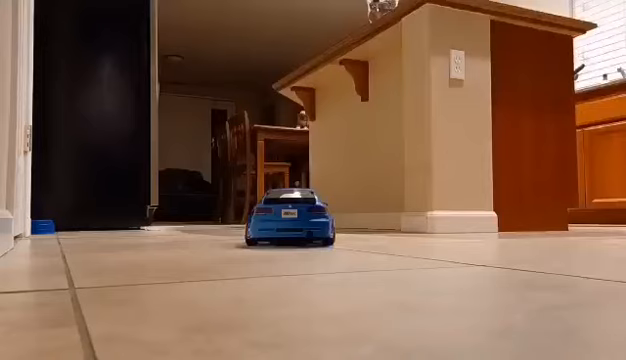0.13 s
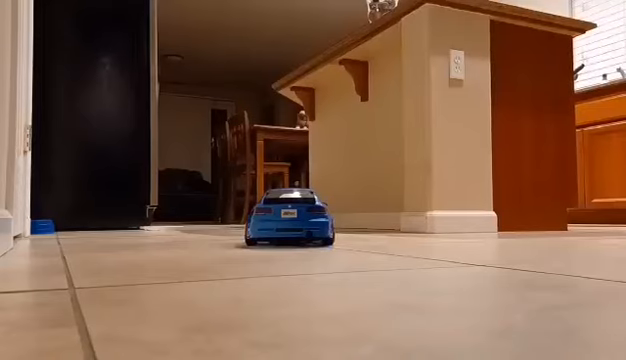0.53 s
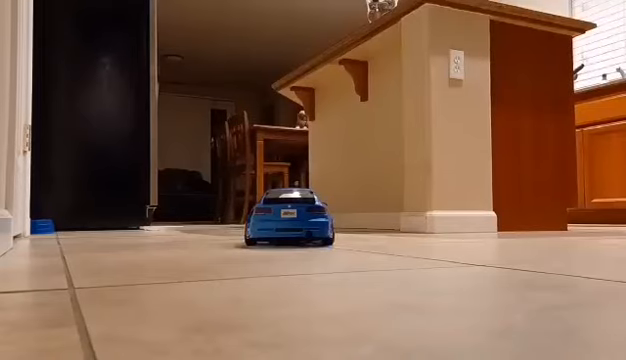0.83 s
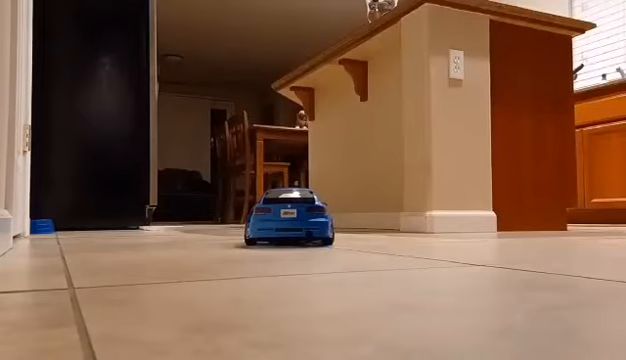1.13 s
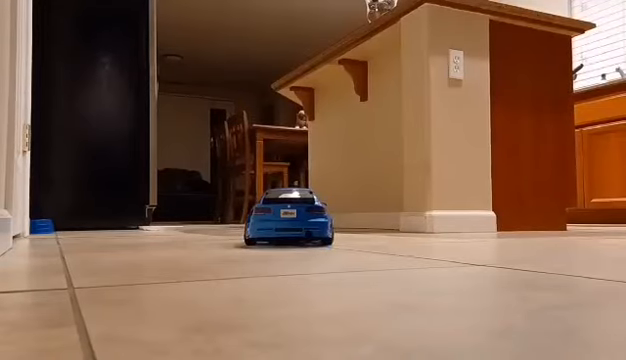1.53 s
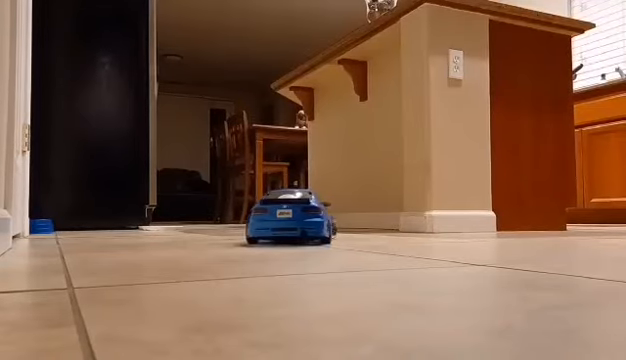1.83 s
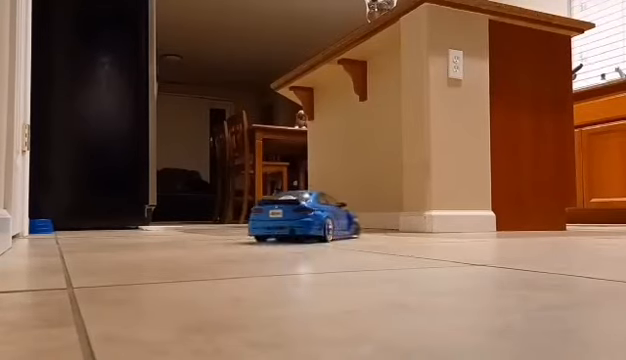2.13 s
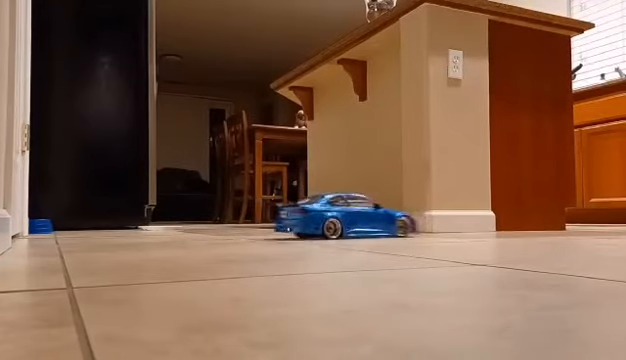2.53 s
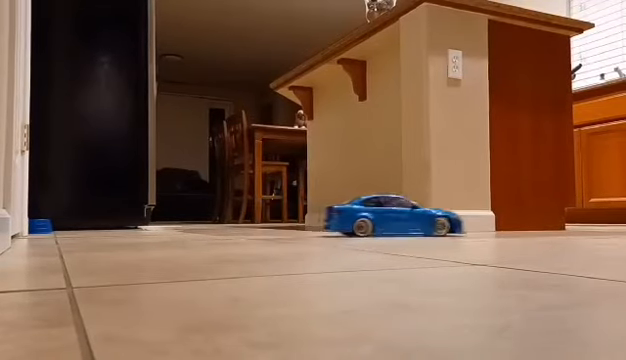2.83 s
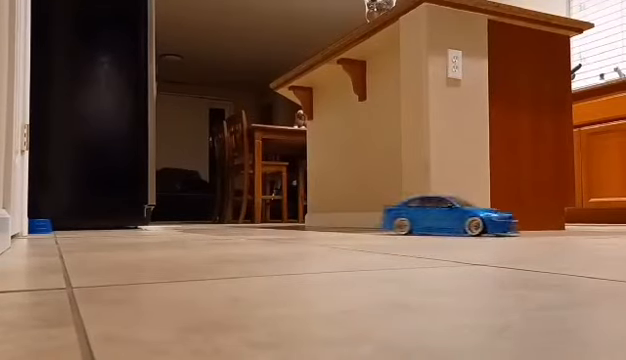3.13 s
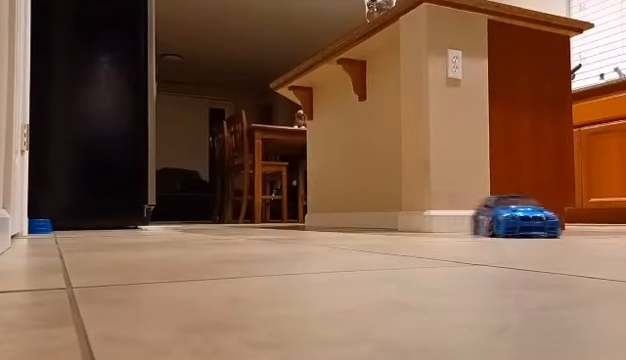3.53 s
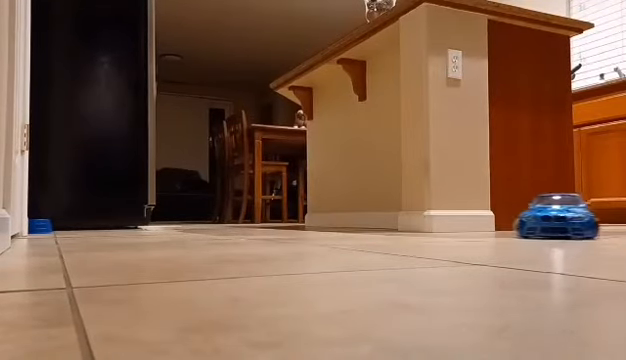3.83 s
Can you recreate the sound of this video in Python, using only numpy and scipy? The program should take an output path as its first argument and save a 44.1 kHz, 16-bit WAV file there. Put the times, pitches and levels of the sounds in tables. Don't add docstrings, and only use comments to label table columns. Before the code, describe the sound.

A small electric toy car waits in a quiet, faintly humming kitchen, ticks faintly, then whirs away with gear whine and tyre rumble; bright pops echo nearby, heard from a stereo microphone at floor level.

```python
import sys
import numpy as np
from scipy import signal
from scipy.io import wavfile
from scipy.ndimage import uniform_filter1d

SR = 44100
rng = np.random.default_rng(int(sys.argv[2]) if len(sys.argv) > 2 else 0)


def output_pcm(signal):
    pcm = np.clip(np.atleast_2d(signal).T, -1, 1) * 32767
    wavfile.write(sys.argv[1], SR, np.round(pcm).astype(np.int16))


def ratio_of_db(decibels):
    return 10 ** (np.asarray(decibels, float) / 20)


N = 176400
T = np.arange(N) / SR

# t/s, snap
# level/dB, thump level/dB, thump left-right/dB, ducking/dB
SPARKS = [(1.8840, -12.5, -10, -4, 12), (2.132, -15.5, -18, 17.5, 8), (2.2839, -13, -19, 7, 10),
          (2.3834, -15, -72, -11, 0.5), (2.4764, -12.5, -31.5, -5, 3.5), (2.623, -11.5, -32.5, -4, 8),
          (2.7401, -7, -26.5, 1.5, 11.5), (2.9387, -9, -46, -9, 2.5), (3.0532, -11, -35.5, -11, 2),
          (3.3251, -11.5, -54, -4, 1), (3.444, -8, -40, -3, 2), (3.6926, -5, -28, 2, -1),
          (3.9272, -8, -39, 4, -0.5), (1.8903, -12.5, -40, -2, 2), (2.139, -17, -42, -2, -0.5),
          (2.29, -12, -34, -5, 1)]
# (f/Hz, left-right/dB)
CAR_SAME = [(100, 0.9), (400, 0.61), (1000, 0.13), (5000, 0.046)]
CAR_LEFT = [(300, 1.7), (2000, 2.2), (12000, 0.73)]


def evened(x):
    return x / np.sqrt(np.mean(x ** 2) + 1e-20)


def read(points, hz):
    f, v = np.transpose(points)
    return np.interp(np.log(hz + 1), np.log(f + 1), v)


def resonate(x, hz, width):
    turn = np.exp(2j * np.pi * np.cumsum(hz * np.ones(N)) / SR)
    r = np.exp(-np.pi * width / SR)
    for _ in range(2):
        x = 2 * (turn * signal.lfilter([1 - r], [1, -r], x / turn)).real
    return x


def resonate_once(x, hz, width):
    turn = np.exp(2j * np.pi * hz * np.arange(1, N + 1) / SR)
    r = np.exp(-np.pi * width / SR)
    return 2 * (turn * signal.lfilter([1 - r], [1, -r], x / turn)).real


def noise(shape, same, left_db, patchy_db, churn_db, flicker_db):
    frames, hz = N // 128 + 5, np.fft.rfftfreq(512, 1 / SR)
    a, b, c, d, patches, churn = rng.standard_normal((frames, 257, 6)).T
    patches = evened(uniform_filter1d(uniform_filter1d(patches, size=4, axis=0), size=12, axis=1))
    churn = evened(uniform_filter1d(uniform_filter1d(churn, size=4, axis=0), size=50, axis=1))
    flicker = evened(uniform_filter1d(rng.standard_normal(frames), size=3))
    alike = np.clip(read(same, hz), -1, 1)[:, None]
    left = a + 1j * b
    right = alike * left + np.sqrt(1 - alike ** 2) * (c + 1j * d)
    level_db = read(shape, hz)[:, None] + patchy_db * patches + churn_db * churn + flicker_db * flicker
    side_db = read(left_db, hz)[:, None] / 2
    z = np.array([left, right]) * ratio_of_db(level_db) * ratio_of_db(np.array([side_db, -side_db]))
    return evened(signal.istft(z, nperseg=512, noverlap=384)[1][:, :N])


def ring(modes, length):
    t = T[:length]
    return sum(ratio_of_db(db - 60 * t / t60) * np.sin(2 * np.pi * hz * t) for hz, t60, db in modes)


def room():
    # f/Hz, level/dB per Hz
    air = [(15, -50), (25, -20), (54, 7), (516, -2.5), (1110, -9.5), (1480, -12.5), (3350, -4), (9300, -21),
           (13500, -34)]
    # f/Hz, left-right likeness
    air_same = [(60, 0.47), (280, 0.88), (700, 0.043), (2000, 0.0082)]
    # f/Hz, left-right/dB
    air_left = [(60, 2.5), (500, 11), (1200, 19), (2300, 2.5), (8000, 4.5), (13000, -23)]
    # f/Hz, level/dB rms
    hum_lines = [(59.2, -68.5), (1116, -68.5), (2234, -80.5), (3340, -73.5)]
    hum = np.zeros((2, N))
    for hz, db in hum_lines:
        side_db = read(air_left, hz) / 2 * np.array([[1], [-1]])
        hum += np.sqrt(2) * ratio_of_db(db + side_db) * np.sin(2 * np.pi * hz * T + 6 * rng.random())
    return ratio_of_db(-54) * noise(air, air_same, air_left, patchy_db=0.15, churn_db=0.65, flicker_db=-0.3) + hum


def waiting_ticks():
    # t/s, peak level/dB
    ticks = [
        (0.2628, -49),
        (0.2941, -67),
        (0.306, -43),
        (0.433, -44),
        (0.568, -42.5),
        (1.4725, -42),
        (1.4897, -35),
        (1.5097, -30.5),
    ]
    s, db = np.transpose(ticks)
    clicks = np.zeros((2, N))
    clicks[:, (s * SR).astype(int)] = ratio_of_db(db + np.array([[2.5], [-3.5]]))
    tick = ring([(12200, 0.004, -6), (11500, 0.0036, -2.0), (10200, 0.0032, -9), (7660, 0.0036, -5.5)], 600)
    return signal.oaconvolve(clicks, tick[None])[:, :N]


def gear_hiss(turns, away):
    # f/Hz, level/dB per Hz
    hiss_near = [(50, -45), (282, -7), (429, -20), (542, -11.5), (1000, -10), (4870, -15), (6150, -23.5),
                 (11800, -15.5), (13300, -27)]
    # f/Hz, level/dB per Hz
    hiss_away = [(29, -63), (50, -62), (282, 2.5), (429, -3.5), (885, -0.5), (2780, -1.5), (4870, -7),
                 (7960, -2.5), (13300, -70)]
    near = noise(hiss_near, CAR_SAME, CAR_LEFT, patchy_db=0.5, churn_db=3.0, flicker_db=-0.7)
    far = noise(hiss_away, CAR_SAME, CAR_LEFT, patchy_db=1.5, churn_db=2.0, flicker_db=4.0)
    hiss = np.sqrt(1 - away) * near + ratio_of_db(0.7) * np.sqrt(away) * far
    return hiss * (1 + 0.23 * np.cos(4 * np.pi * turns))


def chassis_rings(rattle, rate):
    # f/Hz, width/Hz, level/dB
    parts = [(1785, 140, -4.5), (2180, 170, -11.5), (2710, 820, -2), (5030, 1800, -8), (6650, 760, -8.5),
             (9840, 680, -3.5), (10340, 1700, -3.5), (12130, 480, -8.5)]
    rings = sum(ratio_of_db(db) * evened(resonate_once(rattle, hz, width)) for hz, width, db in parts)
    return ratio_of_db(-2) * rings * (rate / 28) ** 1.6


def gear_mesh(rattle, rate):
    teeth = [(67.6, -12, 25, 1.65, 2.5), (150, -2, 380, 1.53, 1.72), (121, -1, 450, 1.54, 1.65),
             (172.2, -9, 400, 1.6, 2.6), (32.5, -10, 130, 1.58, 2), (104, -1.5, 960, 3.38, 3.63),
             (99.6, 2.5, 720, 3.7, 3.84), (111.1, 0.5, 640, 3.92, 4.05), (136, -0.5, 57, 3.96, 4.05),
             (23.48, -6, 100, 3.52, 3.7), (41.13, -3.5, 86, 3.93, 5.4), (94.5, -1.5, 1800, 2.52, 2.66)]
    mesh = np.zeros((2, N))
    for k, db, fuzz, on, off in teeth:
        fade = np.clip(np.minimum(T - on, off - T) / 0.051, 0, 1)
        mesh += ratio_of_db(db) * fade * evened(resonate(rattle, k * rate, fuzz))
    return mesh


def tyre_drum(turns):
    # f/Hz, width/Hz, level/dB
    shell = [(285, 81, -13.5), (349.2, 38, -5.5), (432.6, 23.5, 0), (501, 62, -3.5)]
    # multiple of axle rate, level/dB
    orders = [(9, -15), (11, -4), (12, -18), (13, -7), (15, 0), (17, -11), (20, -13), (22, -17)]
    clean_from_s, clean_until_s, clean_db, worn_db = 1.73, 2.465, -3.5, -15.5
    rub = rng.standard_normal(N) + 0.23 * rng.standard_normal((2, N))
    drum = evened(sum(ratio_of_db(db) * evened(resonate(rub, hz, width)) for hz, width, db in shell))
    lines = sum(ratio_of_db(db) * np.sin(2 * np.pi * (k * turns + rng.random())) for k, db in orders)
    worn = np.clip(np.maximum(T - clean_until_s, clean_from_s - T) / 0.11, 0, 1)
    grip = ratio_of_db(clean_db + worn_db * worn)
    return ratio_of_db(-3.5) * drum * np.sqrt(1 - np.minimum(0.98 * grip, .9)) + grip * lines


def car():
    # t/s, axle rate/Hz, motor effort/dB, tyre drumming/dB
    drive = [(1.497, 9.4, -62.5, -73.5), (1.513, 12.4, -36, -55), (1.591, 21.9, -25, -38.5),
             (1.702, 27, -26.5, -28.5), (1.841, 28.7, -27, -24.5), (1.969, 29.2, -30, -28.5),
             (2.46, 28.7, -34, -30.5), (2.56, 28, -36, -34.5), (2.703, 23.9, -36.5, -32),
             (3.12, 26.5, -38, -32.5), (3.261, 26, -52, -32), (3.311, 24.4, -51, -36.5),
             (3.35, 27, -38.5, -34), (3.702, 27.6, -37, -32), (3.771, 25, -36, -39),
             (3.893, 20, -47.5, -35), (3.939, 24.3, -37, -52), (4.0, 25.4, -33.5, -31.5)]
    s, rate, effort_db, tyre_db = np.transpose(drive)
    rate = np.interp(T, s, rate)
    effort, tyre = ratio_of_db(np.interp(T, s, effort_db)), ratio_of_db(np.interp(T, s, tyre_db))
    wobble = evened(uniform_filter1d(rng.standard_normal(N), size=3000))
    turns = np.cumsum(rate * (1 + 0.0029 * wobble)) / SR
    away = np.clip((T - 2.515) / 0.52 + .5, 0, 1)
    flat = [(50, 0), (13200, 0), (13500, -40)]
    rattle = noise(flat, CAR_SAME, CAR_LEFT, patchy_db=3, churn_db=3.5, flicker_db=1.1)
    whine = gear_hiss(turns, away) + chassis_rings(rattle, rate)
    tile = .2 + (.45 - .2) * away
    whine = ratio_of_db(-1.7) * (whine + tile * np.roll(whine, 11, axis=1))
    motor = effort * (whine + gear_mesh(rattle, rate))
    return motor + tyre * tyre_drum(turns) * ratio_of_db(np.array([[1.3], [-1.3]]))


def echoing_space():
    # delay/s, level/dB
    echoes = [
        (.0056, -9),
        (.0102, -9),
        (.0135, -12),
        (.021, -15),
    ]
    t = T[:15000]
    space = ratio_of_db(-3.5 - 60 * t / .3) * rng.standard_normal((2, 15000)) * (t > .004) / 30
    space[:, 0] = 1
    for delay, db in echoes:
        space[[0, 1], (delay * SR + rng.uniform(-8, 8, 2)).astype(int)] += ratio_of_db(db)
    return space


def pops():
    # f/Hz, t60/s, level/dB
    snap_modes = [(8050, .0055, 2), (9600, .004, -3), (11200, .004, -1), (12700, .004, -1),
                  (13900, .002, -12), (7000, .003, -11), (4600, .003, -10), (3300, .003, -8),
                  (2100, .004, -9)]
    # f/Hz, t60/s, level/dB, extra loss at the far port/dB per dB, extra loss as blows weaken/dB per dB, lag/s
    boom_modes = [(90, .075, -3.5, 4, .25, 0), (205, .055, -10, 0, -.2, .0012)]
    t, snaps, blows = T[:4000], np.zeros((2, N + 4000)), np.zeros((2, N + 4000))
    u = t / .00035
    blow = np.exp(-u) * np.minimum(u / .7, 1) * 2.6
    for s, snap_db, thump_db, left_db, _ in SPARKS:
        i = round(s * SR)
        weaker_db = thump_db + abs(left_db) / 2 + 8.5
        for ch, sign in enumerate((.5, -.5)):
            detune, colour = rng.standard_normal((2, len(snap_modes)))
            modes = [(hz * (1 + 0.01 * a), t60, db + 2.5 * b)
                     for (hz, t60, db), a, b in zip(snap_modes, detune, colour)]
            snaps[ch, i:i + 800] += ratio_of_db(snap_db - 5.5) * ring(modes, 800) * np.minimum(t[:800] / 0.0001, 1)
            boom = np.zeros(4000)
            for hz, t60, db, lean, loss, lag in boom_modes:
                boom_db = db + lean * min(sign * left_db, 0) + loss * weaker_db - 60 * t / t60
                boom -= ratio_of_db(boom_db) * np.cos(2 * np.pi * hz * (t - lag))
            thump = blow + boom * np.minimum(t / .0012, 1)
            blows[ch, i:i + 4000] += ratio_of_db(thump_db + sign * left_db) * thump
    return signal.fftconvolve(snaps, echoing_space(), axes=1)[:, :N] + blows[:, :N]


def gain_control():
    duck_db = np.zeros(N)
    for s, _, _, _, depth_db in SPARKS:
        width = np.where(T < s, .007, .033)
        duck_db += depth_db * np.exp(-((T - s) / width) ** 2)
    return ratio_of_db(-duck_db)


def masked(x):
    # from t/s, until t/s
    sags = [
        (1.9, 1.925),
        (2.86, 2.93),
        (3.78, 3.86),
        (3.89, 3.92),
    ]
    edge_hz = 13200
    hz, t, z = signal.stft(x, SR, nperseg=1024, noverlap=768)
    ripple = uniform_filter1d(rng.standard_normal(z.shape[1:]), size=2, axis=0)
    ripple = evened(uniform_filter1d(ripple, size=9, axis=1))
    top_db = -12 * np.maximum(hz - edge_hz, 0)[:, None] / 1000
    z = z * ratio_of_db(2.6 * ripple * (hz > 600)[:, None] + top_db)
    power = (abs(z) ** 2).sum(0)[:512].reshape(128, 4, -1).mean(1)
    level_db = 10 * np.log10(uniform_filter1d(power, size=5, axis=1) + 1e-20)
    whim = evened(uniform_filter1d(rng.standard_normal(power.shape), size=5, axis=1))
    weak = level_db + 3 * whim < uniform_filter1d(level_db, size=15, axis=0) - 4.2
    sagging = np.any([(t > a) & (t < b) for a, b in sags], axis=0)
    weak |= (hz[:512:4] > 12500)[:, None] & sagging
    calm = level_db < uniform_filter1d(level_db, size=41, axis=1) + 13
    weak, calm = np.repeat(weak, 4, axis=0), np.repeat(calm, 4, axis=0)
    bins = hz[:512, None]
    drop = np.where(bins > edge_hz, calm, weak & (bins > 1900))
    keep = np.vstack([~drop, drop[:1]])
    return signal.istft(z * keep, SR, nperseg=1024, noverlap=768)[1][:, :N]


def scene():
    gain = gain_control()
    toy = car() * gain + pops()
    toy = np.array([np.roll(toy[0], 5), toy[1]])
    return toy + (room() + waiting_ticks()) * gain


def low_pass(x):
    return signal.sosfilt(signal.butter(12, 14210, fs=SR, output="sos"), x)


def record(dry):
    low_cut = signal.butter(3, 52, "high", fs=SR, output="sos")
    heard = masked(signal.sosfiltfilt(low_cut, dry))
    mix = heard * np.clip((T - 0.061) / 0.013, 0, 1)
    return low_pass(mix)


dry = scene()
out = record(dry)
output_pcm(out)
```